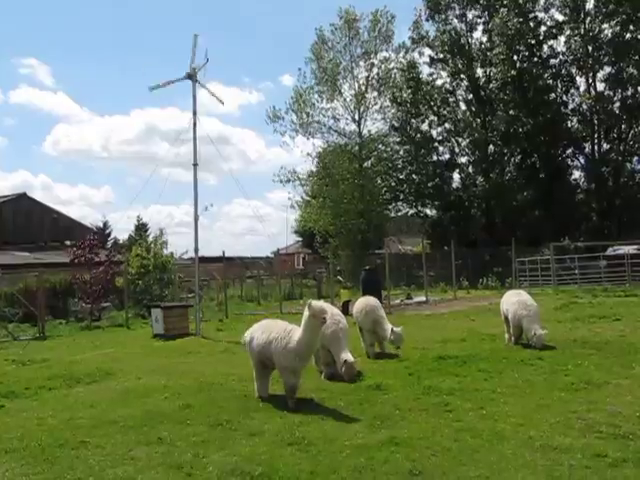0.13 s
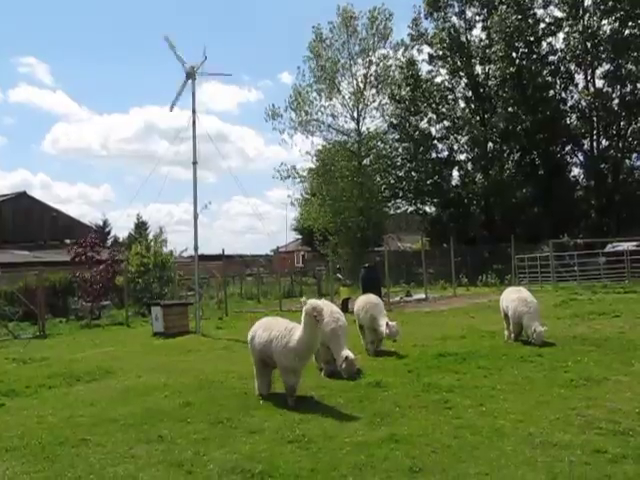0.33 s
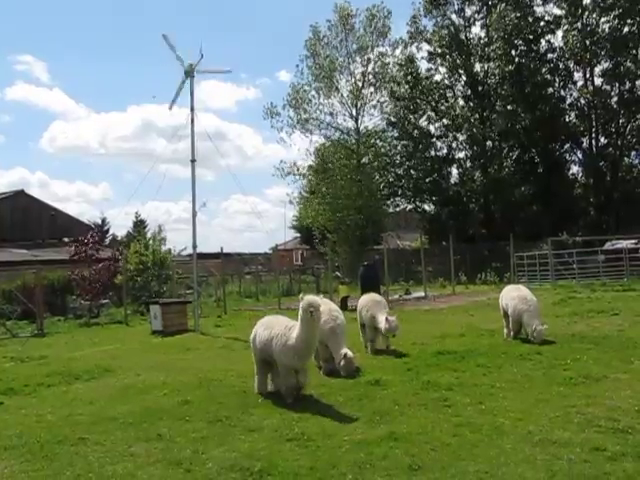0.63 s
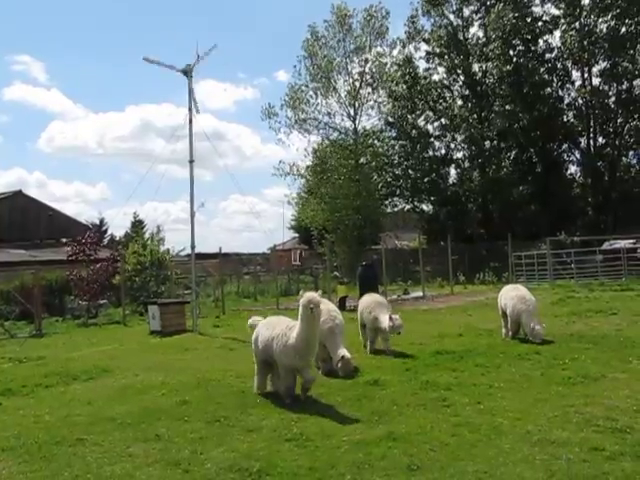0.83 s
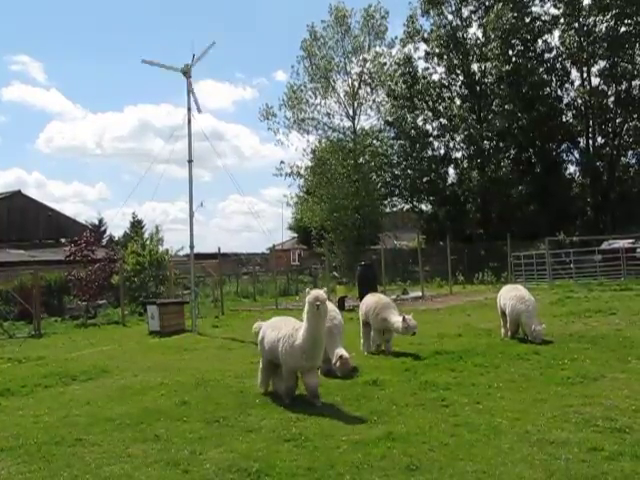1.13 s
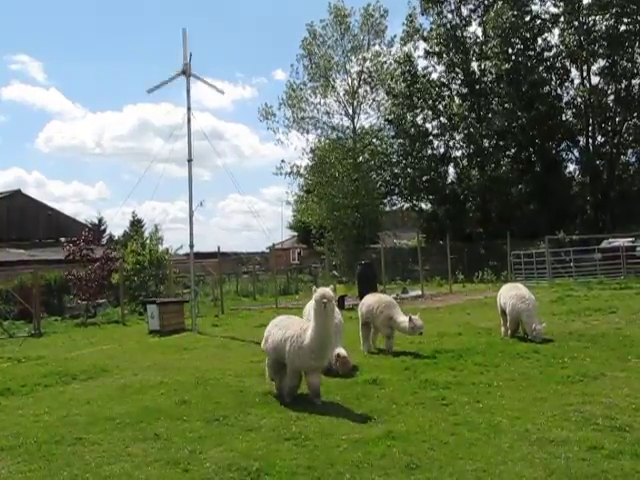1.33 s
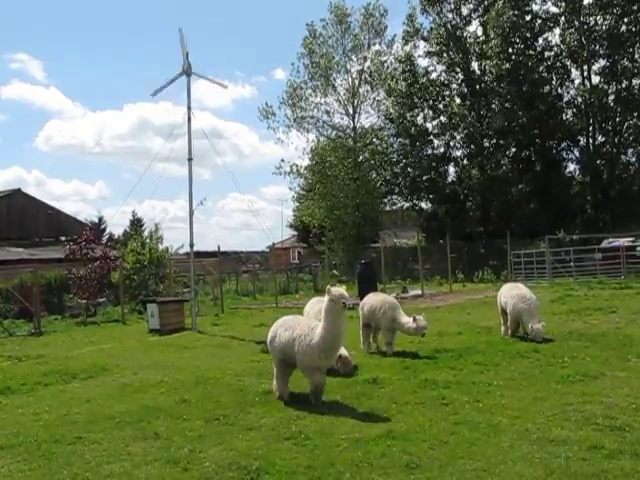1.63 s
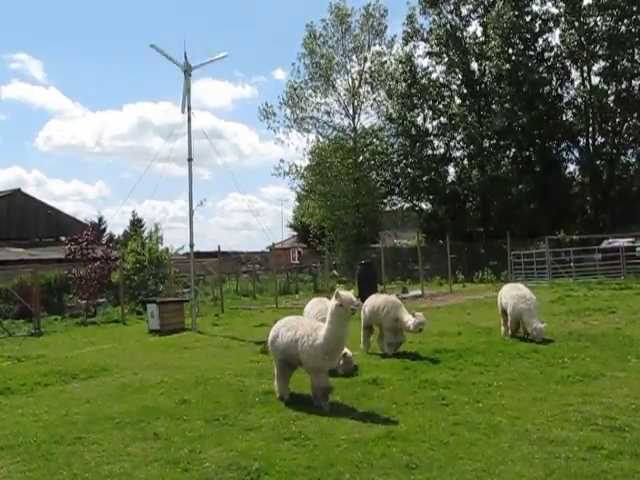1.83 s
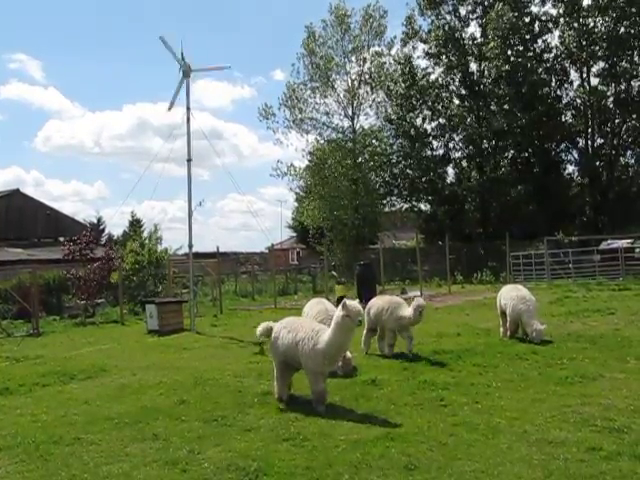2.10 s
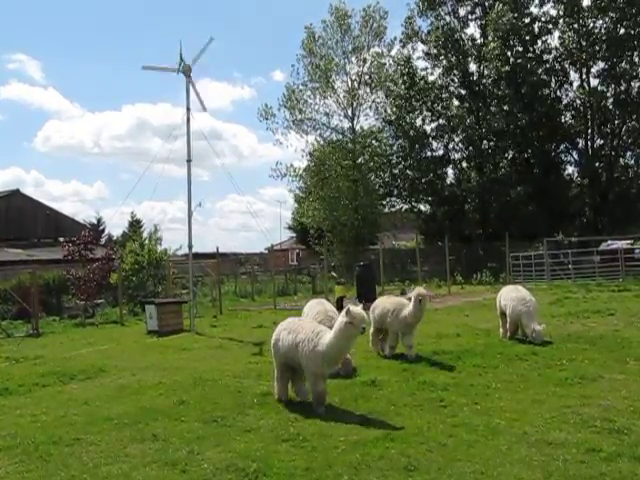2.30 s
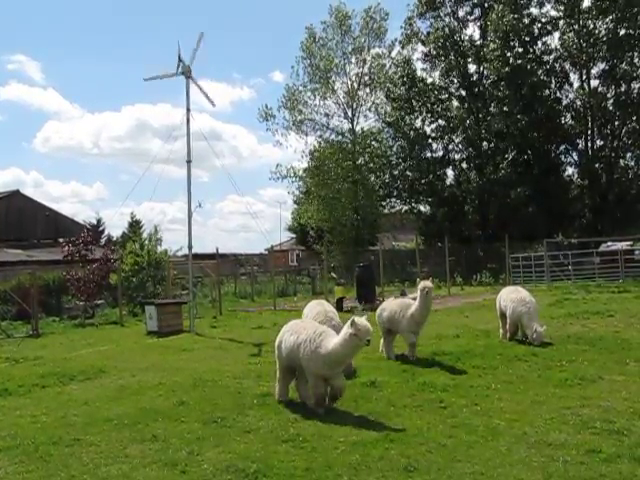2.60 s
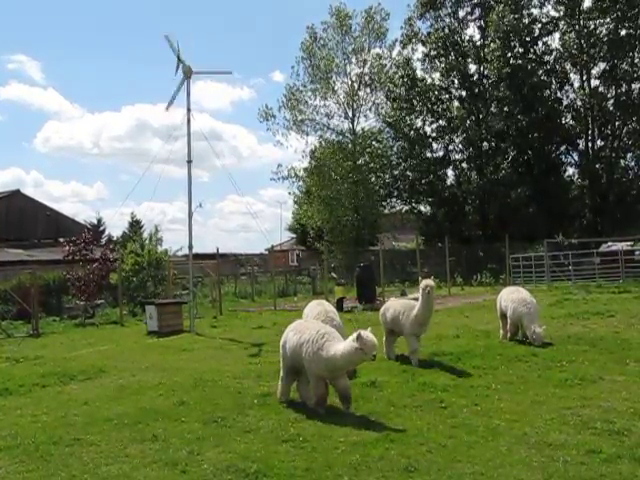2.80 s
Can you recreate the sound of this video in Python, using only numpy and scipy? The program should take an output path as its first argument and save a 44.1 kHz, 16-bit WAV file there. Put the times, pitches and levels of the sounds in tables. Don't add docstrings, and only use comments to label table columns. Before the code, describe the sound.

Wind thumps and rumbles on a small camera's bare stereo microphone, strongest mid-way and on the right, then easing as the hiss of leaves in tall trees swells; faint distant bird chirps, open grassy paddock.

```python
import sys
import numpy as np
from scipy import signal
from scipy.fft import rfft, irfft, next_fast_len
from scipy.io import wavfile
from scipy.ndimage import uniform_filter1d

SR = 44100
rng = np.random.default_rng(int(sys.argv[2]) if len(sys.argv) > 2 else 0)


def persist_wave(psi):
    counts = np.round(np.clip(psi, -1, 1) * 32767).astype(np.int16)
    wavfile.write(sys.argv[1], SR, np.atleast_2d(counts).T)


def invert_db(level):
    return 10 ** (np.asarray(level, dtype=float) / 20)


N = 130095


def at_hz(points, hz):
    table_hz, value = np.transpose(points)
    return np.interp(np.log(hz), np.log(table_hz), value)


def in_time(rows):
    curve = np.interp(np.arange(N) / SR, *np.transpose(rows))
    return uniform_filter1d(curve, size=800, mode="nearest")


def rms_one(x):
    return x / np.sqrt(np.mean(x ** 2) + 1e-20)


def drift(rate_hz):
    r = np.exp(-2 * np.pi * rate_hz * 20 / SR)
    white = rng.standard_normal(N // 20 + 3002)
    slow = signal.lfilter([1], [1, -2 * r, r * r], white)[3000:]
    return np.interp(np.arange(N) / 20, np.arange(len(slow)), rms_one(slow))


def bands(x, spectrum, low_hz, count):
    size = next_fast_len(N)
    hz = np.maximum(np.arange(size // 2 + 1) * SR / size, 1)
    whole = rfft(x, size) * invert_db(at_hz(spectrum, hz))
    place = np.clip(2 * np.log2(hz / low_hz), 0, count - 1)
    for k in range(count):
        share = np.maximum(1 - abs(place - k), 0)
        yield low_hz * 2 ** (k / 2), irfft(whole * share, size)[..., :N]


# frequency in Hz, share from 0 to 1.
LIKENESS = [(300, 1), (1500, 0.79), (3000, 0.56), (6000, 0.25), (9000, 0.57), (13000, .05)]


def trees(spectrum, low_hz, count):
    out = 0
    together_db = 0.3 * drift(0.57)
    noise = rng.standard_normal((3, N))
    for hz, (mid, left, right) in bands(noise, spectrum, low_hz, count):
        alike = np.clip(at_hz(LIKENESS, hz), 0, 1)
        wide = np.sqrt(alike) * mid + np.sqrt(1 - alike) * np.array([left, right])
        flicker_db = 0.7 * drift(16.0)
        out = out + invert_db(together_db + flicker_db) * wide
    return rms_one(out)


# frequency in Hz, level in dB per Hz.
ROAR = [(120, -16), (200, -2.5), (330, 4), (430, 2.5), (520, -1.5), (900, -1), (1600, -13), (2400, -13.5)]


def far_roar(swell_db):
    below_leaves_db, follows = -2, 1.12
    mean_db = swell_db.mean()
    roar_db = below_leaves_db + mean_db + follows * (swell_db - mean_db)
    spectrum = [(30, -46.0)] + ROAR + [(6000, -65)]
    return invert_db(roar_db) * trees(spectrum, 92, count=9)


# frequency in Hz, level in dB per Hz.
LEAVES = [(820, -30), (1400, -5), (1840, -5.5), (2110, -3), (3640, -2.5), (4190, -5.5), (8220, -17.5),
          (9560, -21.5), (15500, -38.5)]


def poplar_leaves(swell_db):
    steep = [(500, -37)] + LEAVES[1:]
    return invert_db(swell_db) * trees(steep, 1150, count=9)


# start in seconds, length in seconds, then start, middle and end pitch in Hz.
NOTES = [(.531, .023, 4740, 4700, 4450), (.55, .016, 4550, 4100, 3480), (.573, .014, 3650, 3880, 3750),
         (.603, .035, 3560, 4000, 3520), (.638, .028, 3480, 3360, 3380), (1.284, .022, 5480, 5490, 5480),
         (1.331, .029, 5900, 5400, 4750), (1.852, .022, 4100, 4600, 5100), (.752, .034, 4880, 4900, 4800),
         (2.28, .032, 5450, 5500, 5520), (.668, .026, 3500, 3600, 3850), (1.302, .011, 5450, 5300, 5100)]
NOTE_DB = [-50, -47.5, -50, -47, -51, -52.5, -55, -56, -59, -60, -54, -57]
NOTE_PAN_DB = [-3, -2, -3, -1, 2, 4, 4, -4, 0, 0, 0, 6]
FLUTTER_DEPTH_HZ = [70, 50, 60, 155, 90, 15, 30, 60, 90, 15, 90, 15]


def birds():
    edge_s, flutter_hz, smear_t60_s, smear_db = .003, 170, .12, -10
    out = np.zeros((2, N))
    rows = zip(NOTES, NOTE_DB, NOTE_PAN_DB, FLUTTER_DEPTH_HZ)
    for (start_s, length_s, first_hz, middle_hz, last_hz), db, pan_db, depth_hz in rows:
        t = np.arange(int(length_s * SR)) / SR
        u = t / length_s
        arch_hz = first_hz * (1 - u) * (1 - 2 * u) + 4 * middle_hz * u * (1 - u) + last_hz * u * (2 * u - 1)
        hz = arch_hz + depth_hz * np.sin(2 * np.pi * flutter_hz * t)
        edges = np.clip(np.minimum(t, length_s - t) / edge_s, 0, 1)
        note = np.sin(2 * np.pi * np.cumsum(hz) / SR) * edges
        side_db = np.array([[.5], [-.5]]) * pan_db
        first = int(start_s * SR)
        out[:, first:first + len(t)] += np.sqrt(2) * invert_db(db + side_db) * note
    tail = rng.standard_normal((2, 6000)) * invert_db(-60 * np.arange(6000) / SR / smear_t60_s)
    tail = tail / np.sqrt(np.sum(tail[0] ** 2))
    return out + invert_db(smear_db) * signal.fftconvolve(out, tail, axes=1)[:, :N]


def knocks(events, modes):
    out = 0
    start_s, peak_db = np.transpose(events)
    for hz, level_db, t60_s in modes:
        uneven_db = rng.normal(0, 0.77, len(start_s))
        sign = rng.choice([-1, 1], len(start_s))
        clicks = np.full(N, 1e-18)
        clicks[(start_s * SR).astype(int)] = invert_db(peak_db + level_db + uneven_db) * sign
        r, w = invert_db(-60 / (t60_s * SR)), 2 * np.pi * hz / SR
        out = out + signal.lfilter([0, np.sin(w)], [1, -2 * r * np.cos(w), r * r], clicks)
    return out


# start in seconds, peak in dB.
TICKS = [
    (1.696, -47),
    (2.442, -36),
    (2.79, -45),
]
# frequency in Hz, level in dB, 60 dB decay in seconds.
TWIG = [(1100, -5, .02), (3500, 3, .025), (4300, 0, .02), (5200, -4, .012), (6200, -1, .015),
        (11000, -18, .01)]


def twig_ticks():
    return knocks(TICKS, TWIG)


def late(x):
    lag_s, left_db = 6.8e-5, -1.12
    hz = np.arange(N // 2 + 1) * SR / N
    left = irfft(rfft(x[0]) * np.exp(-2j * np.pi * lag_s * hz), N)
    return np.array([invert_db(left_db) * left, x[1]])


# start in seconds, peak in dB.
SNAPS = [(0.926, -28), (0.939, -34), (0.959, -34), (0.994, -38), (1.011, -35), (1.048, -36), (1.068, -29),
         (1.088, -34), (1.122, -27), (1.163, -37), (1.237, -33), (1.265, -40), (1.334, -39), (1.379, -34),
         (1.412, -35), (1.426, -35), (1.454, -36), (1.468, -31), (1.499, -34), (1.521, -29), (1.535, -35),
         (1.549, -34), (1.578, -39), (.384, -38), (.569, -37), (.629, -35), (.737, -39)]
# frequency in Hz, level in dB, 60 dB decay in seconds.
SNAP_RING = [(514, -1, 0.02), (768, -6, 0.027), (1035, -7, 0.011), (1310, -16.5, .012)]


def port_snaps():
    soft = signal.butter(4, 1700, fs=SR, output="sos")
    return signal.sosfilt(soft, knocks(SNAPS, SNAP_RING)) * [[0], [invert_db(6.0)]] + 0


# frequency in Hz, share.
FOLLOW = [(15, 0.11), (40, 0.86), (80, 0.43), (160, 1.475), (350, 1.22), (800, 1.58)]


def port(force, puffs, spectrum, skew):
    lump_db, lump_hz, patch_db, patch_hz = 2.5, 47.2, 4, 28.2
    lumpy_from_hz, lumpy_octaves = 35, 5
    steady = .75
    t = np.arange(N) / SR
    shapes = np.array([np.exp(-.5 * ((t - s) / length_s) ** 2) for s, _, length_s, _ in puffs])
    force_db = 20 + in_time(force)
    puff_db = np.array(puffs)[:, 1] @ shapes
    bright_db = np.array(puffs)[:, 3] @ shapes
    white = rng.standard_normal(N)
    lumps = rms_one(white * invert_db(lump_db * drift(lump_hz)))
    eddies = np.array([white, lumps]) * np.sqrt(SR / 2)
    out = 0
    for hz, (smooth, lumpy) in bands(eddies, spectrum, 15.74, count=12):
        lumpiness = np.clip(np.log2(hz / lumpy_from_hz) / lumpy_octaves, 0, 1)
        x = smooth + lumpiness * (lumpy - smooth)
        power = uniform_filter1d(x ** 2, size=int(300 + 2 * SR / hz))
        power = uniform_filter1d(power, size=500) / np.mean(x ** 2)
        strike_db = uniform_filter1d(puff_db + bright_db * np.log2(hz / 120), size=int(SR / hz))
        gain_db = at_hz(FOLLOW, hz) * force_db + strike_db + patch_db * drift(patch_hz)
        out = out + x * invert_db(gain_db) / (power + 0.11) ** (steady / 2)
    push = out ** 2 / np.sqrt(uniform_filter1d(out ** 2, size=2000) + 1e-12)
    return out + skew * signal.sosfilt(signal.butter(2, 90, "high", fs=SR, output="sos"), push)


# time in seconds, force in dB.
FORCE_LEFT = [(0, -32), (.2, -83), (.33, -51.5), (.64, -59), (.8, -62.5), (1.02, -29.5), (1.15, -39.5),
              (1.33, -39), (1.5, -30), (1.7, -44.5), (1.8, -61), (2.0, -57), (2.08, -35), (2.26, -47),
              (2.35, -55), (2.6, -66), (2.95, -53.5)]
FORCE_RIGHT = [(0, -26), (.14, -25.5), (.3, -29), (.39, -27.5), (.5, -26.5), (.65, -22.5), (.8, -25.5),
               (.92, -17.5), (1.17, -12.5), (1.23, -24.5), (1.5, -15.5), (1.65, -24), (1.72, -23),
               (1.98, -38.5), (2.12, -28), (2.65, -41), (2.78, -49.5), (2.95, -42.5)]
# time in seconds, level above the gust in dB, length in seconds, brightness in dB per octave.
PUFFS_LEFT = [(0.345, 9.5, 0.018, -5), (0.44, 10, .02, 10), (0.57, -2.5, 0.043, -11), (0.633, 12, 0.02, 6),
              (0.886, 10, 0.029, 2), (1.006, 7.5, 0.014, 0), (.98, 3.5, 0.0098, 7), (1.06, -1, .008, 2.5),
              (1.081, 12, 0.0069, -2), (1.123, 8.5, 0.025, 7.5), (1.155, 12, 0.013, -2.5),
              (1.228, 3.5, 0.015, 1.5), (1.31, 6, .012, -0.5), (1.37, 6, .012, -1),
              (1.415, 12.5, 0.0061, 1.5), (1.505, 7, 0.012, 1), (1.57, 6, .012, 0.5),
              (1.626, 3.5, 0.026, 1), (1.73, 6.5, 0.018, 7), (1.907, 9.5, 0.013, -4),
              (2.096, 4, 0.05, -2.5), (2.265, 13, 0.022, 4), (2.555, 11, 0.028, 2), (2.609, 18, 0.021, 13)]
PUFFS_RIGHT = [(0.114, 8, 0.016, -4.5), (0.167, 10, 0.012, -0.5), (.255, 5.5, 0.012, -1),
               (0.336, 5.5, 0.013, 2.8), (0.397, 11, 0.023, 2), (0.574, 7.5, 0.017, 4),
               (0.631, 6.5, 0.018, 4.5), (0.702, 10.5, 0.013, 2.5), (0.944, 6, 0.018, -1),
               (1.386, 8, 0.0067, -6), (0.757, 6, 0.011, -2), (0.888, 15, 0.0037, -8),
               (0.911, 8.5, 0.0074, -3.5), (.968, 5.5, 0.003, -2.5), (1.02, 4.5, 0.018, 2.5),
               (1.052, 5.5, 0.01, -3.5), (1.107, 1, 0.0072, 0.5), (1.328, 12, 0.0037, -5),
               (1.352, 2, .007, 0), (1.44, 3.5, 0.015, 1.5), (1.467, 3.5, 0.0055, 2.5),
               (1.533, 7.5, 0.0099, -1.5), (1.592, 6, 0.011, 1.5), (1.621, 6, 0.005, -1),
               (2.03, -1, 0.0089, -13), (2.101, 15, 0.0065, -3), (2.185, 9, 0.018, -5),
               (2.252, 5, 0.013, -0.5), (0.854, 4.5, 0.014, 2), (.205, 4.5, 0.012, 3.5),
               (1.77, -3, 0.011, -2.5), (0.948, -1.5, 0.019, 2), (1.078, -4, 0.015, 3.5),
               (1.131, 5.5, 0.01, -0.7), (1.173, 3.5, 0.014, -1), (1.254, 9, 0.016, 2.5),
               (1.3, 7.5, 0.034, -1.4), (1.39, 3.5, 0.019, 3.9), (1.511, 3.5, 0.03, 1.6),
               (1.652, 13, 0.016, -2.3), (1.821, 7.5, 0.032, 1.5), (1.92, 3.5, 0.047, -2.7),
               (2.093, 6, 0.006, 0), (2.137, 17, 0.0086, -1.8), (2.268, 10.5, 0.02, -3),
               (2.368, 13.5, 0.015, -5.5), (2.486, 13, 0.043, 0.5), (2.62, 15.5, 0.044, -0.6),
               (2.898, 0, 0.16, -5)]
# frequency in Hz, level in dB per Hz.
EDDY_LEFT = [(12, -61.5), (30, -39), (90, -38.5), (170, -52.5), (260, -51), (500, -71), (1000, -99),
             (2500, -110)]
EDDY_RIGHT = [(12, -60.5), (45, -43), (130, -41), (190, -48.5), (260, -57), (500, -73), (1000, -90.5),
              (2500, -108)]


def port_wind():
    fade = [(8000, -150)]
    left = port(FORCE_LEFT, PUFFS_LEFT, EDDY_LEFT + fade, skew=-0.56)
    right = port(FORCE_RIGHT, PUFFS_RIGHT, EDDY_RIGHT + fade, skew=0.15)
    return np.array([left, right])


# time in seconds, level in dB.
LEAVES_SWELL = [(0.04, -51.5), (0.77, -49), (1.32, -49), (2.11, -47), (2.95, -43)]


def scene():
    swell_db = in_time(LEAVES_SWELL)
    far = far_roar(swell_db) + poplar_leaves(swell_db) + birds() + twig_ticks()
    return late(far) + port_snaps() + port_wind()


def low_pass(x):
    return signal.sosfilt(signal.butter(12, 15720, fs=SR, output="sos"), x)


def record(dry):
    start_s, top_hz, ceiling = .03627, 15720, .95
    started = np.arange(N) / SR > start_s
    dull = signal.sosfiltfilt(signal.ellip(8, .3, 50, top_hz, fs=SR, output="sos"), dry)
    rounded = ceiling * np.tanh(dull / ceiling)
    return low_pass(rounded * started)


dry = scene()
out = record(dry)
persist_wave(out)
```